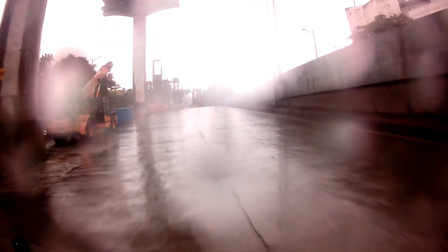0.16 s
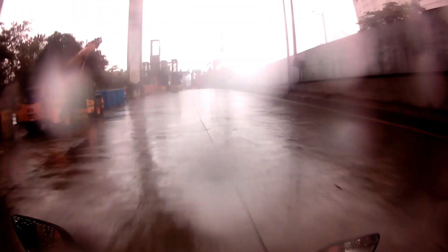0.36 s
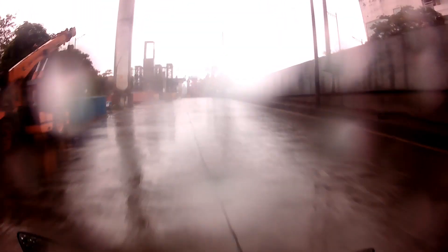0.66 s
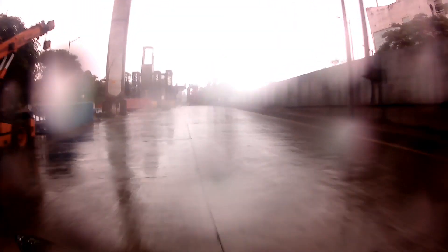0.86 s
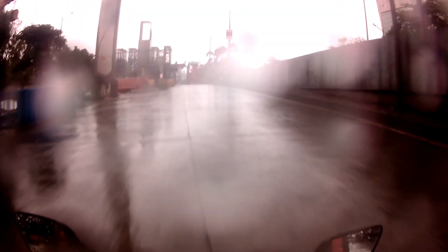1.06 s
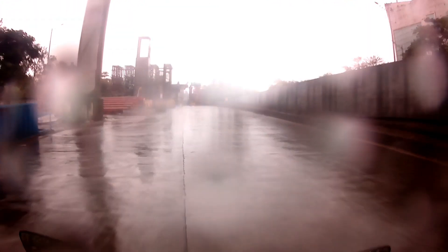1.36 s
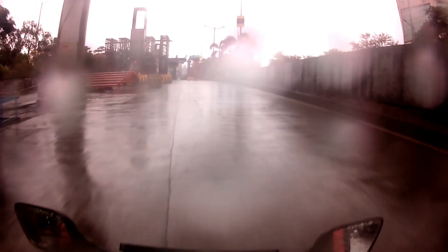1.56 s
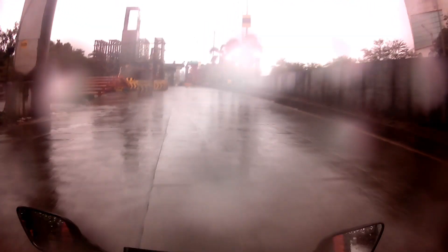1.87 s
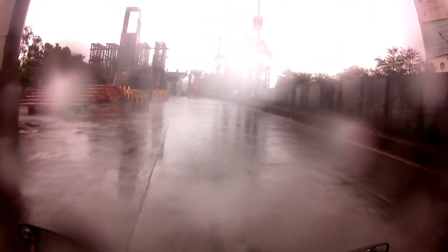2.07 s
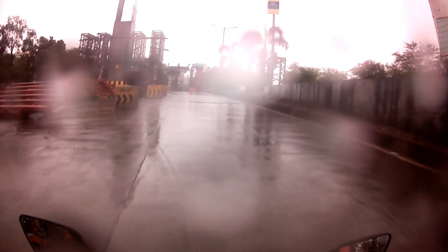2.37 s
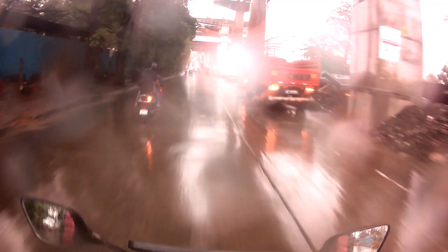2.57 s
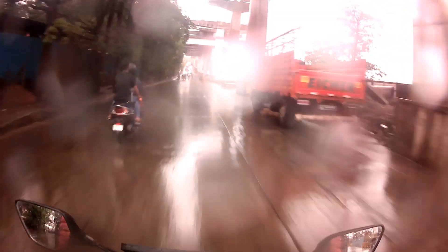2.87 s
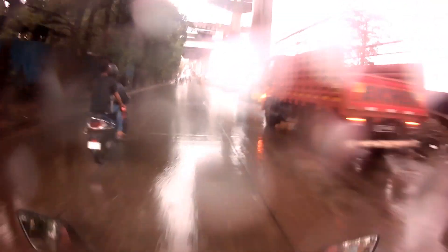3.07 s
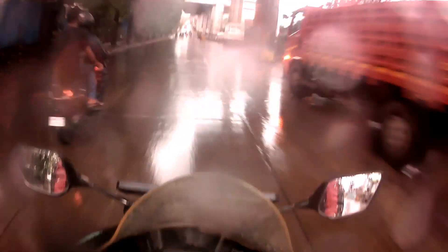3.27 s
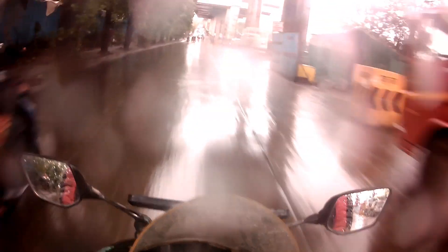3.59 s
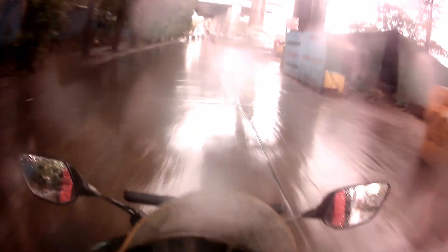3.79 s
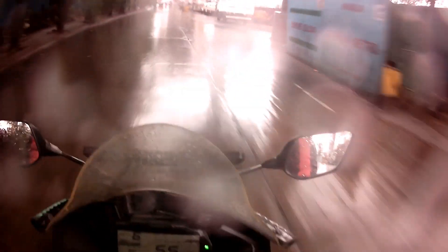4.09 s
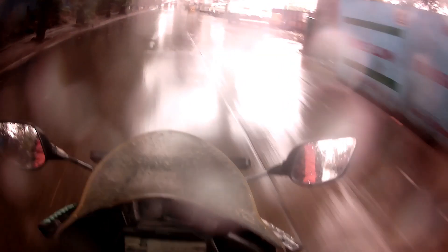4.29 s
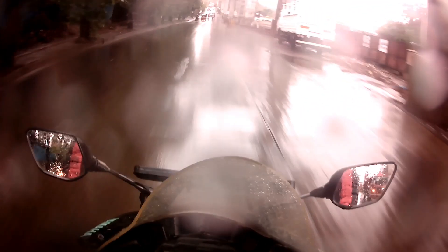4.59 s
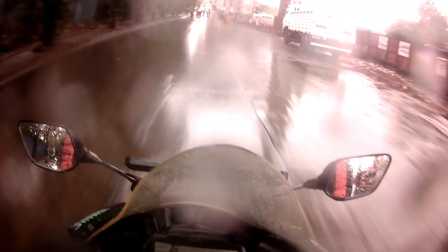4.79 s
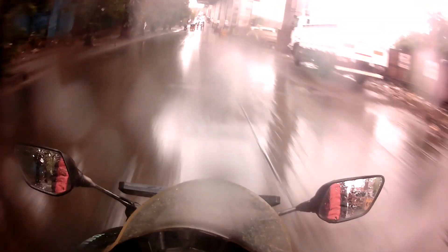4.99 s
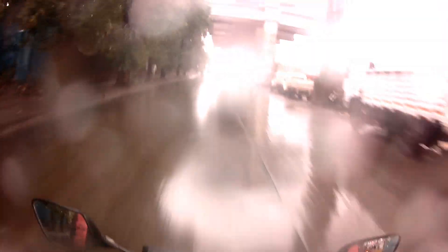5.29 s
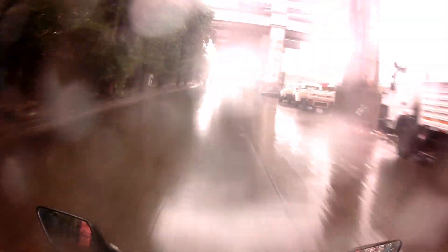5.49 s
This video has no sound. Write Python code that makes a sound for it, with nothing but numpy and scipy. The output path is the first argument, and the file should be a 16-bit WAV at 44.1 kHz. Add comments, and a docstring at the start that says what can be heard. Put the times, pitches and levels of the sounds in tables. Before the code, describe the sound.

Muffled wet-road roar and low wind buffeting inside a sealed housing, with raindrop ticks and dull knocks on the shell as a motorcycle rides.

```python
"""Motorcycle ride on a wet road

Heard from inside a closed plastic housing: shaped noise makes the wind's buffeting, boom and flutter,
and the dull tyre roar, spray and wavering whistles that come through the walls.
Sine orders hum for the engine; raindrops ring the shell's modes with short hisses; knocks ring its low modes.
A deep shudder, a faint steady tone, one click and a trace of hiss complete it; loud peaks are rounded off.
"""
import sys
import numpy as np
from scipy import signal
from scipy.fft import rfft, irfft, next_fast_len
from scipy.io import wavfile

SR = 44100
rng = np.random.default_rng(int(sys.argv[2]) if len(sys.argv) > 2 else 0)


def to_wav(s):
    """Save 16-bit WAV."""
    ch = np.atleast_2d(s).T  # columns
    pcm = np.round(np.clip(ch, -1, 1) * 32767)  # PCM
    wavfile.write(sys.argv[1], SR, pcm.astype(np.int16))


N = 249076   # length [samples]

# engine hum: (time [s], base rate [Hz], third order level [dB], fifth order level [dB])
ENGINE_ORDERS = [(2.9, 49.66, -64, -56), (3.3, 51.7, -49, -49.5), (3.8, 54, -51.5, -51),
                 (4.25, 56.27, -50.5, -49.5), (4.45, 56.3, -71, -49.5), (4.8, 55.37, -52, -54)]
# sudden step of the wave, heard as a click: (time [s], step [dB])
CLICK = (2.5244, -20)

# road strength: (time [s], roar level [dB], upper whistle level [dB])
ROAD_LEVELS = [(0.0, -37, -45.5), (0.8, -38, -56.5), (1.7, -40, -54.5), (2.51, -41.5, -50.5),
               (2.53, -39.5, -44), (3.0, -40, -45), (3.5, -40, -46), (4.3, -39, -43), (4.6, -37.5, -49.5),
               (5.1, -37, -52.5), (5.65, -38.5, -51.5)]
# colour of the roar through the walls: (frequency [Hz], relative density [dB per Hz])
ROAR_SPECTRUM = [(300, -11.5), (430, -7), (620, -3), (820, -9.5), (1090, -4.5), (1230, -5), (1400, -6),
                 (1600, -10), (2050, -12.5), (2220, -18), (2450, -21.5), (3100, -22), (3330, -29.5),
                 (3500, -24.5), (3780, -17), (3950, -18.5), (4200, -3)]
# edges of the noise bands whose levels change on their own: (frequency [Hz], ...)
PATCH_EDGES = (450, 700, 950, 1250, 1600, 2200, 2900, 3600, 4300)
# spray against the roar: (time [s], level [dB])
SPRAY_LEVEL = [(0.0, -1.5), (1.2, -0.5), (2.4, -1.5), (2.7, 3), (4.0, 2.5), (5.65, -4)]
# centre of the upper whistle: (time [s], frequency [Hz])
UPPER_WHISTLE_PITCH = [(0, 1380), (2.51, 1389), (2.53, 1450), (3.2, 1440), (3.7, 1400), (4.2, 1382),
                       (4.6, 1360), (5.65, 1377)]
# wall resonances: (frequency [Hz], width of one filter pass [Hz])
WALL_RESONANCES = [(1080, 100), (741.3, 39), (1654, 45)]
# whistle of each wall resonance: (time [s], first level [dB], second level [dB], third level [dB])
WALL_WHISTLE_LEVELS = [(0.298, -71.5, -62.5, -65), (0.699, -48, -60, -62), (1.399, -57, -65, -65),
                       (2.3, -59, -68, -61.5), (2.702, -64, -62.5, -58.5), (3.601, -68, -51.5, -55.5),
                       (4.2, -49.5, -54, -52), (5.102, -52.5, -59.5, -58), (5.65, -50.5, -63, -60.5)]

# large drops on the shell: (time [s], strength [dB], brightness [dB per octave])
LARGE_DROPS = [(0.058, -18, 2), (0.192, -14, -10), (0.379, -12, 3.5), (0.635, -14, -7), (0.685, -22, -6),
               (0.72, -14.5, 3.5), (0.865, -18, -8), (0.989, -19, -15), (1.072, -18, -13),
               (1.233, -19.5, -6.5), (1.361, -27, -17), (1.853, -15, 6.5), (1.981, -7, -1.5),
               (1.986, -11.5, -11), (2.18, -22, -12), (2.238, -16, -6), (2.418, -18, 3), (2.464, -12.5, -1),
               (2.542, -18.5, 9.5), (2.55, -22, -8), (2.609, -16, -3), (2.64, -20, -6.5),
               (2.908, -22.5, -12), (3.224, -19.5, 6), (3.583, -23, 0), (4.107, -16, 1), (4.113, -18, -8),
               (4.152, -20, -2), (4.675, -15, -7)]
# ringing modes of the shell: (frequency [Hz], relative level [dB], 60 dB decay time [s])
SHELL_MODES = [(627, -13, 0.016), (846, -6, 0.015), (1082, -8, 0.027), (1425, 0.5, 0.015),
               (1430, -8.5, 0.012), (1716, -3, 0.012), (2130, -6, 0.025)]
# heavy knocks on the housing: (time [s], strength [dB], brightness [dB per octave])
HEAVY_KNOCKS = [(0.057, -17.5, 0.5), (0.132, -20.5, -0.5), (0.189, -31, -7), (0.266, -27.5, 2),
                (0.394, -19, 2), (0.541, -20, -2), (0.676, -25, -3.5), (0.719, -12, 2.5),
                (0.857, -17.5, -0.5), (0.892, -17.5, -0.5), (1.067, -16, 3), (1.117, -23.5, 2),
                (1.229, -17.5, 1), (1.511, -35, 6), (1.668, -26, 5), (1.746, -29.5, -8.5),
                (1.841, -16.5, 2), (1.912, -29.5, 3), (1.975, -25, 8), (2.056, -19, 1), (2.126, -17, 1.5),
                (2.176, -14.5, 1.5), (2.237, -19.5, 0.5), (2.415, -13, 2), (2.468, -25, -1),
                (2.539, -12.5, 3), (2.858, -23.5, -3), (3.673, -30, -1), (3.789, -34, 1), (3.893, -27.5, 0),
                (4.151, -25, 5), (4.535, -31, -3), (4.659, -29, -2.5), (4.781, -31.5, -4.5), (4.99, -26, 0),
                (5.204, -20.5, -0.5), (5.45, -29.5, -4), (5.564, -27, 1)]
# low modes of the housing: (frequency [Hz], relative level [dB], 60 dB decay time [s])
BODY_MODES = [(61.7, -1.5, 0.14), (98.8, 1, 0.09), (151, -6.5, 0.021), (196, -7, 0.062), (323, -9.5, 0.029),
              (473, -4, 0.029), (564, -12.5, 0.032)]

# wind: (time [s], buffeting level [dB], boom level [dB], upper boom level [dB], flutter level [dB])
WIND_LEVELS = [(0.0, -23, -25.5, -38, -39), (0.06, -25.5, -37, -31.5, -38.5),
               (0.2, -19.5, -34.5, -34, -37.5), (0.23, -29.5, -37, -42.5, -40),
               (0.44, -28, -40, -44.5, -39), (0.5, -39.5, -33, -44, -43), (0.61, -24, -35.5, -43, -40.5),
               (0.66, -33, -37, -43, -43), (0.72, -21, -37.5, -42, -38.5), (0.85, -37, -37.5, -38.5, -43),
               (0.88, -12, -36, -36, -45.5), (0.94, -26.5, -36, -35.5, -42.5),
               (1.15, -24.5, -28, -45, -39.5), (1.18, -36.5, -28, -44, -41), (1.37, -22, -31, -38, -38),
               (1.56, -22, -35.5, -41, -42), (1.79, -29, -34, -40, -41), (2.0, -17.5, -32, -36, -42.5),
               (2.04, -27.5, -33, -37.5, -40.5), (2.33, -18, -30.5, -41, -41), (2.41, -30, -34, -42, -45),
               (2.47, -19, -36, -41, -41), (2.64, -35, -33.5, -42, -43.5), (3.04, -25, -36, -40.5, -41),
               (3.45, -37.5, -38, -43.5, -45), (3.66, -32.5, -34, -42, -45.5),
               (3.71, -44.5, -39.5, -43, -43.5), (3.78, -30, -39, -43.5, -42.5),
               (4.29, -28.5, -32.5, -43, -40.5), (4.77, -36.5, -40.5, -48.5, -42),
               (4.81, -28.5, -34, -40, -45.5), (4.88, -43, -35, -41, -39.5), (4.95, -30, -32, -43.5, -40),
               (5.35, -39.5, -32.5, -41, -39), (5.46, -35, -34, -42.5, -39), (5.65, -43, -22.5, -41, -39)]
# colour of the slow buffeting: (frequency [Hz], relative density [dB per Hz])
BUFFET_SPECTRUM = [(3, -10), (8, -2), (13, -4), (18, -2.5), (25, -15.5), (36, -16), (60, -24)]
# colour of the housing's boom: (frequency [Hz], relative density [dB per Hz])
BOOM_SPECTRUM = [(25, -16), (45, -8), (64, -1.5), (80, -5.5), (100, -18)]
# colour of the upper boom: (frequency [Hz], relative density [dB per Hz])
UPPER_BOOM_SPECTRUM = [(70, -14), (88, 3), (102, -1), (125, -5), (160, -20)]
# colour of the flutter: (frequency [Hz], relative density [dB per Hz])
FLUTTER_SPECTRUM = [(100, -8.5), (150, 0), (200, -2.5), (250, 1.5), (310, -4.5), (400, -14), (550, -41.5)]

WHINE_HZ, WHINE_DB = 3483, -80   # rms level
HISS_DB = -102   # rms before the last filter
BUMP_S, BUMP_LENGTH_S, BUMP_HZ, BUMP_DB = 4.975, 0.18, 27.6, -19.5   # centre time, whole length
PATCH_DB, PATCH_RATE_HZ = 1, 13   # depth and rate of the random level changes, band by band
# depth and lower limit of the random level changes in the highest noise bands
TOP_PATCH_DB, TOP_PATCH_HZ = 3.5, 3500
SPRAY_HZ, SPRAY_FLICKER_DB = 1850, 1   # above this the roar is spray and flickers on its own
UPPER_WIDTH_HZ, UPPER_WAVER_HZ = 145, 24.9   # width of one filter pass, spread of the waver
DROP_SHARE_DB, KNOCK_SHARE_DB = -10.5, 0   # part of a blow's strength that one mode takes
WALL_CUT_HZ = 1830   # the shell passes little of a tick above this
SPLASH_DB, SPLASH_T60_S, SPLASH_BAND_HZ = -19.5, 0.032, (594, 1900)   # against the drop, before make-up gain
THUMP_FLOOR_DB, THUMP_SPREAD_DB = -33.5, 2   # small thumps, before the mode levels
MIC_STOP_HZ, FINAL_STOP_HZ = 4637.38, 16800   # where the steep low-passes reach full depth


def from_db(db):
    """Turn decibels into gain."""
    return 10 ** (np.asarray(db) / 20)


def rms_one(x):
    """Scale to rms 1."""
    return x / np.sqrt(np.mean(x ** 2) + 1e-20)


def in_time(rows):
    """Draw each column as a curve with a value at every sample."""
    times, *columns = np.transpose(rows)
    return [np.interp(np.arange(N) / SR, times, column) for column in columns]


def drift(rate_hz):
    """Wander slowly at random: coarse noise through a double one-pole low-pass, spread 1."""
    step = 40   # samples between noise values
    pole = np.exp(-2 * np.pi * rate_hz * step / SR)
    noise = rng.standard_normal(N // step + 2002)
    slow = signal.lfilter([1], [1, -2 * pole, pole * pole], noise)[2000:]   # settled part
    return np.interp(np.arange(N) / step, np.arange(len(slow)), rms_one(slow))


def ring(clicks, hz, t60):
    """Let every unit click start a decaying cosine of height 1."""
    pole, turn = from_db(-60 / (t60 * SR)), 2 * np.pi * hz / SR
    numerator = [1, -pole * np.cos(turn)]
    denominator = [1, -2 * pole * np.cos(turn), pole * pole]
    return signal.lfilter(numerator, denominator, clicks + 1e-18)


def coloured(x, spectrum):
    """Shape the spectrum of x, dropping 40 dB in an octave beyond both ends; rms 1."""
    size = next_fast_len(N)
    hz = np.arange(1, size // 2 + 2) * SR / size
    points, db = np.transpose(spectrum)
    points = [points[0] / 2, *points, points[-1] * 2]
    db = [db[0] - 40, *db, db[-1] - 40]
    shape_db = np.interp(np.log(hz), np.log(points), db)
    return rms_one(irfft(rfft(x, size) * from_db(shape_db), size)[:N])


def turbulence(gusts, shared_db, own_db, rate_hz):
    """White noise whose strength follows the shared gusts and lumps of its own."""
    return rng.standard_normal(N) * from_db(shared_db * gusts + own_db * drift(rate_hz))


def struck(times, strengths_db, modes, tilt, pivot_hz, spread_db, smear_s, contact):
    """Each blow excites every mode by a chance amount, low modes later, with force shaped by the contact."""
    out = np.zeros(N)
    chance = rng.standard_normal((len(times), len(modes)))
    lags = rng.uniform(.5, 1, (len(times), len(modes)))
    signs = rng.choice([-1, 1], len(times))
    lowest_hz = modes[0][0]
    for k, (hz, level_db, t60) in enumerate(modes):
        delay_s = smear_s * lags[:, k] * lowest_hz / hz
        at = np.round((times + delay_s) * SR).astype(int)
        brightness_db = tilt * np.log2(hz / pivot_hz)
        clicks = np.zeros(N)
        clicks[at] = signs * from_db(strengths_db + level_db + brightness_db + spread_db * chance[:, k])
        out += ring(clicks, hz, t60)
    return signal.fftconvolve(out, contact)[:N]


def whine():
    """A faint steady sine, probably electrical."""
    return np.sqrt(2) * from_db(WHINE_DB) * np.sin(2 * np.pi * WHINE_HZ * np.arange(N) / SR)


def click():
    """The wave jumps downward, then relaxes exponentially in a few milliseconds."""
    time_s, step_db = CLICK
    out, at = np.zeros(N), round(time_s * SR)
    out[at:] = -from_db(step_db) * np.exp(-np.arange(N - at) / (0.0042 * SR))
    return out


def engine():
    """Two orders of the firing rate hum while the engine pulls, fading in and out."""
    base_hz, third_db, fifth_db = in_time(ENGINE_ORDERS)
    phase = 2 * np.pi * np.cumsum(base_hz) / SR
    start, end = ENGINE_ORDERS[0][0], ENGINE_ORDERS[-1][0]
    pulling = np.interp(np.arange(N) / SR, [start - .2, start, end, end + .2], [0, 1, 1, 0])
    third = from_db(third_db) * np.sin(3 * phase)
    fifth = from_db(fifth_db) * np.sin(5 * phase)
    return np.sqrt(2) * pulling * (third + fifth)


def bump():
    """A few slow shakes that swell and fade, probably a bump in the road."""
    t = np.arange(N) / SR - BUMP_S
    swell = np.cos(np.pi * np.clip(t / BUMP_LENGTH_S, -.5, .5)) ** 2
    return from_db(BUMP_DB) * swell * np.cos(2 * np.pi * BUMP_HZ * t)


def patchy(x):
    """Vary the level of each noise band at random, independently of the others."""
    out = x.copy()
    for band in zip(PATCH_EDGES, PATCH_EDGES[1:]):
        part = signal.sosfiltfilt(signal.butter(1, band, "band", fs=SR, output="sos"), x)
        depth_db = TOP_PATCH_DB if band[0] > TOP_PATCH_HZ else PATCH_DB
        out += part * (from_db(depth_db * drift(PATCH_RATE_HZ)) - 1)
    return out


def upper_whistle(gusts):
    """A broad band of noise, low-passed around zero and shifted up to a sliding, wavering centre."""
    pole = np.exp(-np.pi * UPPER_WIDTH_HZ / SR)
    noise = turbulence(gusts, 0.4, 0.2, 28.0) + 1j * turbulence(gusts, 0.4, 0.2, 28.0)
    slow = signal.lfilter([1], [1, -2 * pole, pole * pole], noise)
    centre_hz = in_time(UPPER_WHISTLE_PITCH)[0] + UPPER_WAVER_HZ * drift(8.0)
    return rms_one(np.real(slow * np.exp(2j * np.pi * np.cumsum(centre_hz) / SR)))


def wall_whistle(gusts, hz, width_hz):
    """Spray noise meets a wall resonance: turbulence passes the same resonator twice."""
    pole, turn = np.exp(-np.pi * width_hz / SR), 2 * np.pi * hz / SR
    whistle = turbulence(gusts, 0.96, 0.31, 28.0)
    for _ in range(2):
        whistle = signal.lfilter([1, 0, -1], [1, -2 * pole * np.cos(turn), pole * pole], whistle)
    return rms_one(whistle)


def road(gusts):
    """Tyre roar on the wet surface as shaped noise, with flickering spray and broad whistles."""
    roar_db, upper_db = in_time(ROAD_LEVELS)
    roar = from_db(roar_db) * patchy(coloured(turbulence(gusts, 0.52, 0.092, 32.0), ROAR_SPECTRUM))
    spray = signal.sosfilt(signal.butter(2, SPRAY_HZ, "high", fs=SR, output="sos"), roar)
    spray_db = in_time(SPRAY_LEVEL)[0] + SPRAY_FLICKER_DB * drift(60.0)
    out = roar + spray * (from_db(spray_db) - 1)   # the roar already holds the spray once
    out += from_db(upper_db) * upper_whistle(gusts)
    for (hz, width_hz), whistle_db in zip(WALL_RESONANCES, in_time(WALL_WHISTLE_LEVELS)):
        out += from_db(whistle_db) * wall_whistle(gusts, hz, width_hz)
    return out


def rain():
    """Large drops tick the shell, spread over milliseconds; small ones patter at random; walls dull both."""
    touch = np.hanning(15) / 7
    times, strength_db, tilt = np.transpose(LARGE_DROPS)
    large = struck(times, strength_db + DROP_SHARE_DB, SHELL_MODES, tilt, pivot_hz=990,
                   spread_db=-0.5, smear_s=0.00798, contact=touch)
    small_times = np.sort(rng.uniform(0, N / SR - .02, size=120))
    small_db = -46 + 3.5 * np.minimum(rng.exponential(1, len(small_times)), 3)
    small = struck(small_times, small_db, SHELL_MODES, 0, pivot_hz=1200,
                   spread_db=2.5, smear_s=0.0031, contact=touch)
    return signal.sosfilt(signal.butter(6, WALL_CUT_HZ, fs=SR, output="sos"), large + small)


def splash():
    """Each large drop bursts into a short hiss: band-passed noise dying exponentially."""
    times, strength_db, _ = np.transpose(LARGE_DROPS)
    starts = np.zeros(N)
    starts[np.round((times + 0.002) * SR).astype(int)] = from_db(strength_db + SPLASH_DB)
    dying = signal.lfilter([1], [1, -from_db(-60 / (SPLASH_T60_S * SR))], starts + 1e-18)
    burst = dying * 3 * rng.standard_normal(N)   # 3 is the make-up gain
    return signal.sosfilt(signal.butter(5, SPLASH_BAND_HZ, "band", fs=SR, output="sos"), burst)


def knocks():
    """Blows that load slowly and let go fast ring the low modes; small thumps come at random."""
    t = np.arange(300) / SR
    push = np.exp((t - t[-1]) / 0.0018)
    push /= push.sum()
    times, strength_db, tilt = np.transpose(HEAVY_KNOCKS)
    heavy = struck(times, strength_db + KNOCK_SHARE_DB, BODY_MODES, tilt, pivot_hz=197,
                   spread_db=0.0, smear_s=0, contact=push)
    small_times = np.sort(rng.uniform(0, N / SR - .02, size=90))
    small_db = THUMP_FLOOR_DB + THUMP_SPREAD_DB * np.minimum(rng.exponential(1, len(small_times)), 3)
    small = struck(small_times, small_db, BODY_MODES, 0, pivot_hz=200,
                   spread_db=2.0, smear_s=0, contact=push)
    return heavy + small


def wind(gusts):
    """Slow pressure swings, two booms of the housing and a faster flutter, all from shaped noise."""
    buffet_db, boom_db, upper_db, flutter_db = in_time(WIND_LEVELS)
    buffet = from_db(buffet_db) * coloured(turbulence(gusts, 0.4, 0.54, 5.3), BUFFET_SPECTRUM)
    boom = from_db(boom_db) * coloured(turbulence(gusts, 0.21, 0.3, 21.0), BOOM_SPECTRUM)
    upper = from_db(upper_db) * coloured(turbulence(gusts, 0.51, 0.5, 14.0), UPPER_BOOM_SPECTRUM)
    flutter = from_db(flutter_db) * coloured(turbulence(gusts, 0.59, 0.96, 51.0), FLUTTER_SPECTRUM)
    return buffet + boom + upper + flutter


def scene():
    """Everything that reaches the microphone inside the housing; wind and road share the gusts."""
    gusts = drift(5.6)
    background = whine() + engine() + bump() + road(gusts)
    blows = rain() + splash() + knocks()
    return (background + blows + wind(gusts))[None]


def record(dry):
    """Round the highest peaks and cut the top, then add click and hiss under a wider cut."""
    rounded = dry / (1 + (dry / .23) ** 6) ** (1 / 6)   # never exceeds 0.23
    dull = signal.sosfilt(signal.cheby2(14, 90, MIC_STOP_HZ, fs=SR, output="sos"), rounded)
    hiss = from_db(HISS_DB) * rng.standard_normal(N)
    wide_cut = signal.cheby2(14, 70, FINAL_STOP_HZ, fs=SR, output="sos")
    return signal.sosfilt(wide_cut, dull + click() + hiss)


dry = scene()
out = record(dry)
to_wav(out)
```